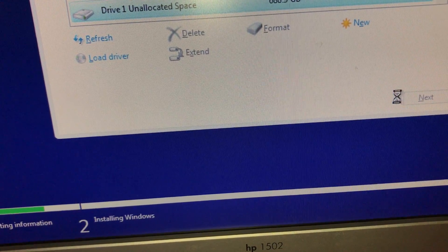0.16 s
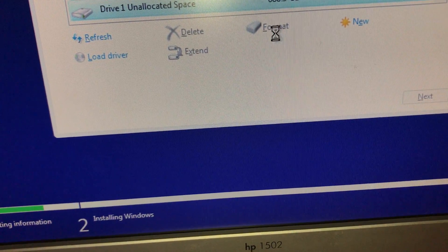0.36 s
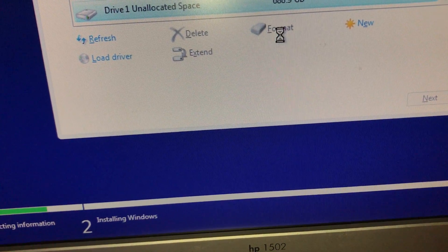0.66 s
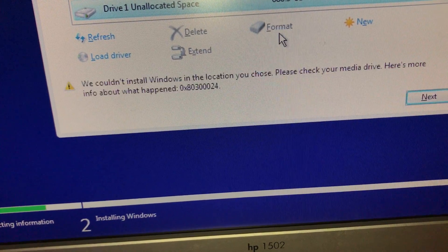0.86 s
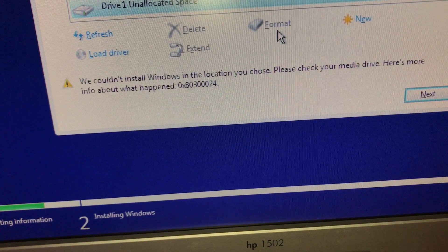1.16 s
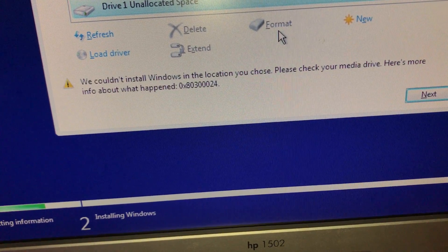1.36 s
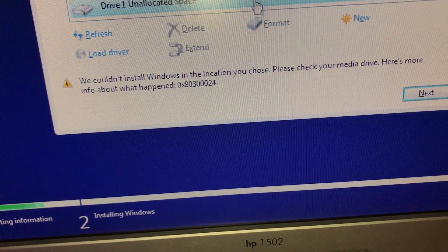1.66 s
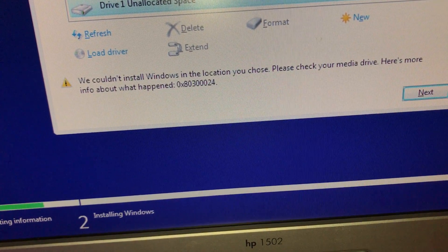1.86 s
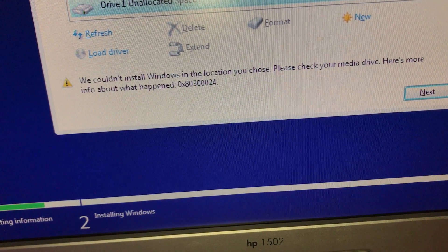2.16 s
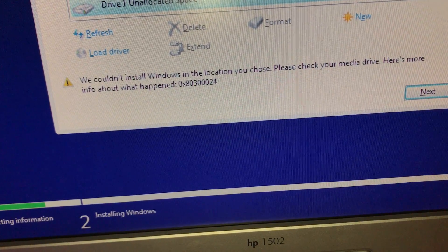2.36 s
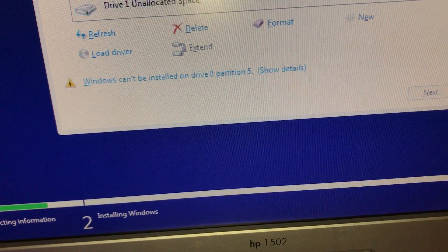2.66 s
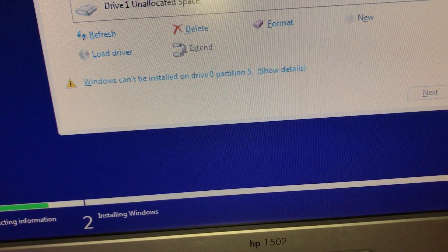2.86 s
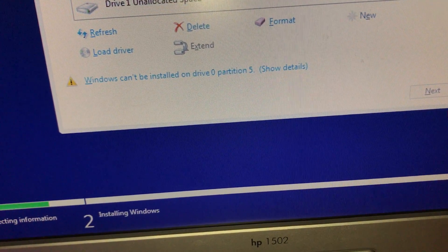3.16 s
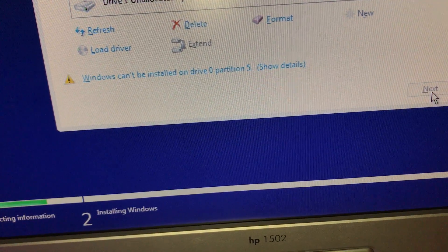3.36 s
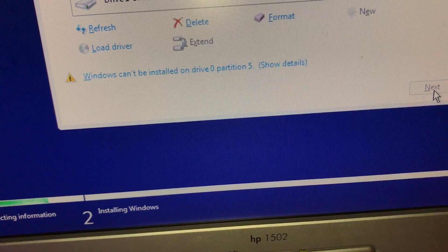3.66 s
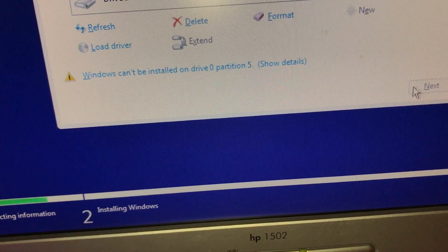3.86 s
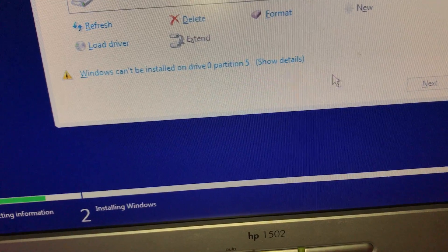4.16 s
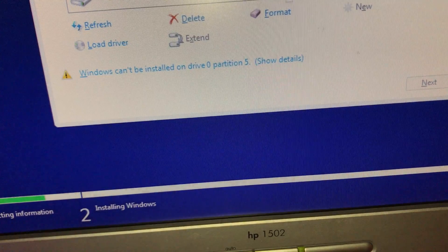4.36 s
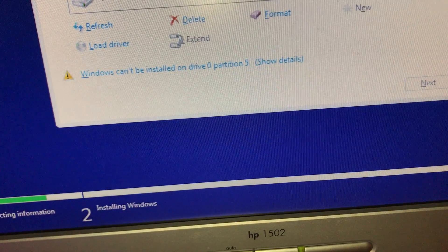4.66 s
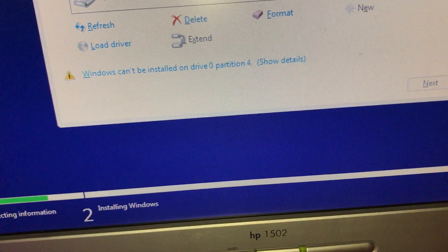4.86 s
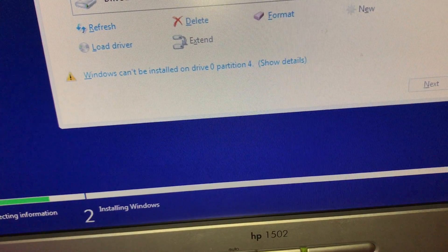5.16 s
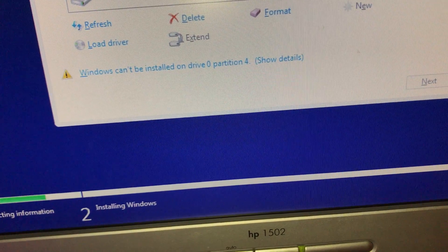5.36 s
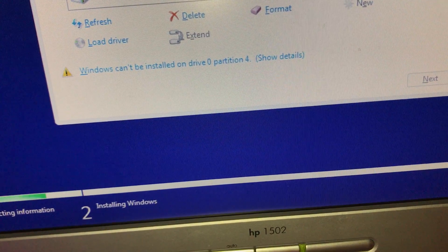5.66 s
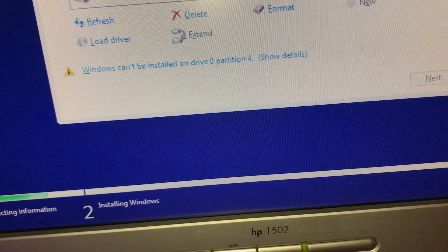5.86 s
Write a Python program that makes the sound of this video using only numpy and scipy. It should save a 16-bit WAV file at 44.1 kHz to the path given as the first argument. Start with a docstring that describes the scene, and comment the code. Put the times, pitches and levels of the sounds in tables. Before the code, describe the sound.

In a quiet room, a microphone near a running computer picks up a steady, slightly hollow fan hum and a low drone. A deep tone swells and sinks, then three pairs of small, sharp mouse clicks follow, the deep tone returning around the third pair. One last single click comes at the end. Brief thin hiss joins the later clicks, over barely audible regular ticking and a high whine.

```python
"""A desktop computer's fans hum and rush in a quiet room, over a low drone that twice swells deeper.
The rotors give the tones; turbulent air hisses in the grilles and rings the hollow case.
A mouse button is pressed and released three times, then pressed again; each snap rings its shell.
A thin hiss comes up briefly with the later clicks. Very faint high ticks keep a regular beat,
and the electronics whine."""
import sys
import numpy as np
from scipy import signal
from scipy.fft import rfft, irfft, next_fast_len
from scipy.io import wavfile
from scipy.ndimage import uniform_filter1d, map_coordinates

SR = 44100
rng = np.random.default_rng(int(sys.argv[2]) if len(sys.argv) > 2 else 0)


def dump_mix(stems):
    """Bounce the given channels to the path in sys.argv[1] as a 16-bit WAV at rate SR."""
    frames = np.atleast_2d(stems).T  # one column per channel
    limited = np.clip(frames, -1, 1)  # hard clip at full scale
    pcm = np.round(limited * 32767).astype(np.int16)
    wavfile.write(sys.argv[1], SR, pcm)


N = 265482
TIME_S = np.arange(N) / SR

# fan and drive tones: pitch_hz, level_db, flutter_ratio
ROTOR_TONES = [(138.95, -53.5, 0.11), (206.6, -55.5, 0.35), (225.9, -58, 0.4), (240.4, -57, 0.33),
               (280.7, -73.5, 0.45), (361, -73, 0.15), (458.4, -71, 0.58), (478, -71, 0.26),
               (541, -72.5, 0.89), (651.4, -71, 0.42), (727, -76, 0.23), (757, -83, .4), (952, -81.5, 0.19),
               (1027, -76, 0.29), (1311, -81, 0.33), (2185, -82, 0.25), (2960, -93, .4)]
# air through the grilles: freq_hz, density_db
GRILLE_SPECTRUM = [(125, -11.5), (145, 0.5), (280, -1.5), (400, -9.5), (800, -14.5), (1400, -15.5),
                   (1800, -18.5), (2300, -19), (4400, -27.5), (4800, -31), (9700, -39.5), (10400, -46),
                   (11800, -40), (15700, -51)]
# air resonances of the case: centre_hz, width_hz, gain_db
CASE_MODES = [(182.8, 13, -0.5), (207.5, 17.6, 0), (223.5, 10, -3), (268.5, 12.3, -11.5),
              (356.8, 14, -14.5), (503, 29, -19), (627, 29, -21.5), (664, 24.6, -13.5), (703.5, 24, -17.5),
              (923, 23, -22), (1045, 12, -22.5), (1112, 9.2, -21.5), (1209, 25, -18.5), (1233, 9.8, -22.5),
              (1350, 82, -25), (2168, 66, -26.5)]
# switch snaps, press and release in turn: start_s, level_db, tilt_db_per_octave
CLICKS = [(2.592, -41.5, 5), (2.6833, -39, 5.5), (3.6512, -43, 3), (3.7341, -40.5, 4), (4.897, -41, 5.5),
          (5.0127, -39, 7), (5.9362, -43, 4.5)]
# switch and plastic shell resonances: centre_hz, width_hz, gain_db
SHELL_MODES = [(1950, 500, -4.5), (3140, 570, -5), (3800, 170, -7), (4400, 300, -8.5), (5420, 200, -1.5),
               (6400, 200, -4.5), (6830, 200, -8.5), (8150, 350, 2), (8980, 640, -9), (9740, 220, -8.5),
               (11340, 260, -8.5), (12400, 260, -12.5), (13200, 330, -19), (14200, 500, -11.5),
               (14800, 650, -13.5)]
# room decay: freq_hz, t60_s
ROOM_DECAY = [(1000, 0.14), (8000, 0.25), (16000, 0.05)]
# low drone of the case in the room: freq_hz, density_db
DRONE_SPECTRUM = [(20, -40), (30, -22), (38, -7), (52, -2.5), (62, -0.5), (78, 1), (86, -10.5), (95, -4.5),
                  (118, -10.5), (129, -24), (200, -58.5)]
# deep tone swells: start_s, hold_s, level_db
BOOM_SWELLS = [(.85, 1.04, -47), (4.8, .15, -48.5)]
# spells of thin hiss: start_s, end_s, level_db
HISS_SPELLS = [(4.898, 5.42, -68.5), (5.94, 6.1, -67)]
# thin hiss: freq_hz, density_db
HISS_SPECTRUM = [(2500, -4), (4500, 0.5), (6200, 1), (7800, -3), (9500, -2.5), (10400, -6), (11500, -2),
                 (15700, -10)]
# tick burst: freq_hz, density_db
TICK_SPECTRUM = [(6000, -20), (10000, -4), (13000, 0), (15700, 0)]
# electronics tones: pitch_hz, level_db
WHINE_TONES = [(8060, -104), (9300, -105), (9605, -90.5), (11815, -94), (11950, -94)]


def fan_hum(drift_hz=0.346, drift_rate_hz=1.94, flutter_rate_hz=7):
    """Each rotor tone drifts in pitch and flutters in the uneven inflow."""
    out = np.zeros(N)
    for pitch_hz, level_db, flutter in ROTOR_TONES:
        phase = 2 * np.pi * (np.cumsum(pitch_hz + drift_hz * wobble(drift_rate_hz)) / SR + rng.random())
        in_phase = (1 + flutter * wobble(flutter_rate_hz)) * np.sin(phase)
        quadrature = flutter * wobble(flutter_rate_hz) * np.cos(phase)
        out += amp(level_db) * unit(in_phase + quadrature)
    return out


def airflow(grille_db=-52.5, case_db=-48, skirt_exponent=1.575):
    """Turbulence hisses in the grilles and rings the hollow case."""
    def case_response(hz):
        return sum(amp(gain_db) * np.abs(resonance(hz, centre_hz, width_hz)) ** skirt_exponent
                   for centre_hz, width_hz, gain_db in CASE_MODES)

    rush = noise(GRILLE_SPECTRUM)
    hollow = unit(filtered(rng.standard_normal(N), case_response))
    return amp(grille_db) * rush + amp(case_db) * hollow


def mouse_clicks(room_db=-22):
    """One snap per press or release, with a faint room echo."""
    out = np.zeros(N + SR)
    for start_s, level_db, tilt_db_per_octave in CLICKS:
        click = amp(level_db) * switch_snap(tilt_db_per_octave)
        echo = amp(room_db) * signal.fftconvolve(click, room_tail())
        onset = round(start_s * SR)
        out[onset:onset + len(click)] += click
        out[onset:onset + len(echo)] += echo
    return out[:N]


def switch_snap(tilt_db_per_octave, peak_s=0.0011, half_width_s=0.0013, rms_span_s=0.0039,
                settle_db=-26, settle_t60_s=0.087):
    """The spring flips and chatters on its contact for about 2 ms, ringing the shell."""
    def shell_response(hz):
        modes = sum((-1) ** i * amp(gain_db) * resonance(hz, centre_hz, width_hz)
                    for i, (centre_hz, width_hz, gain_db) in enumerate(SHELL_MODES))
        return modes * amp(tilt_db_per_octave * np.log2(np.maximum(hz, 1000) / 8000))

    t = np.arange(SR // 20) / SR
    impact = np.exp(-((t - peak_s) / half_width_s) ** 4)
    settling = amp(settle_db - 60 * t / settle_t60_s)
    spectrum = rfft((impact + settling) * rng.standard_normal(len(t)), 2 * len(t))
    # hard contacts drive all pitches evenly
    chatter = irfft(spectrum / running_rms(spectrum, 50))[:len(t)]
    ring = filtered(chatter, shell_response)
    return ring / np.sqrt(np.sum(ring ** 2) / (rms_span_s * SR))


def room_tail():
    """Diffuse room response, energy 1; the top treble dies first."""
    hz, t, spectra = signal.stft(rng.standard_normal(SR // 3), SR, nperseg=256)
    decay = amp(-60 * t / log_interp(ROOM_DECAY, hz)[:, None])
    tail = signal.istft(spectra * decay, SR, nperseg=256)[1]
    return tail / np.linalg.norm(tail)


def air_drone(level_db=-47.5, steadiness=0.43, lift_db=1.7, lift_start_s=3.95, lift_rise_s=0.25):
    """Moving air drones in the room, steady but for one slight, lasting rise."""
    rumble = noise(DRONE_SPECTRUM)
    steadied = rumble / running_rms(rumble, SR // 4, floor=1e-6) ** steadiness
    lift = np.clip((TIME_S - lift_start_s) / lift_rise_s, 0, 1)
    return amp(level_db + lift_db * lift) * unit(steadied)


def boom(pitch_hz=54.55, waver_rad=0.67, waver_rate_hz=5.12, attack_s=0.24, release_db_per_s=15.5):
    """A deep tone twice swells, holds and sinks back into the drone."""
    envelope = np.zeros(N)
    for start_s, hold_s, level_db in BOOM_SWELLS:
        attack = np.clip((TIME_S - start_s) / attack_s, 0, 1)
        released_s = np.maximum(TIME_S - start_s - attack_s - hold_s, 0)
        envelope += attack * amp(level_db - release_db_per_s * released_s)
    phase = 2 * np.pi * (pitch_hz * TIME_S + rng.random()) + waver_rad * wobble(waver_rate_hz)
    return envelope * unit(np.sin(phase))


def hiss(fade_s=0.024):
    """A thin hiss comes up, holds and drops away."""
    envelope = np.zeros(N)
    for start_s, end_s, level_db in HISS_SPELLS:
        inside_s = np.minimum(TIME_S - start_s, end_s - TIME_S)
        envelope += amp(level_db) * np.clip(inside_s / fade_s + 0.5, 0, 1)
    return envelope * noise(HISS_SPECTRUM)


def ticks(beat_s=0.1024, length_s=0.003, quick_start_s=0.0252, quick_db=-75,
          slow_start_s=3.916, slow_db=-71, slow_beats=3):
    """Treble bursts, likely radio interference: every beat, later every third and stronger."""
    slow = TIME_S > slow_start_s + beat_s / 2
    period_s = np.where(slow, slow_beats * beat_s, beat_s)
    elapsed_s = TIME_S - np.where(slow, slow_start_s, quick_start_s)
    gate = (elapsed_s + length_s / 2) % period_s < length_s
    return gate * amp(np.where(slow, slow_db, quick_db)) * noise(TICK_SPECTRUM)


def electronics_whine(rough_db=2, waver_rad=1.6):
    """The electronics sing faintly at fixed pitches, wavering in level and phase."""
    out = np.zeros(N)
    for pitch_hz, level_db in WHINE_TONES:
        envelope = amp(rough_db * wobble(rate_hz=25))
        phase = 2 * np.pi * pitch_hz * TIME_S + waver_rad * wobble(rate_hz=60)
        out += amp(level_db) * unit(envelope * np.sin(phase))
    return out


def amp(db):
    """Decibels to gain."""
    return 10 ** (np.asarray(db) / 20)


def unit(x):
    """Scale to rms 1."""
    return x / np.sqrt(np.mean(x ** 2) + 1e-20)


def running_rms(x, size, floor=0):
    """Rms over a sliding window of size points."""
    return np.sqrt(np.abs(uniform_filter1d(np.abs(x) ** 2, size=size)) + floor)


def log_interp(points, hz):
    """Join (freq_hz, value) points on a log frequency axis."""
    freq_hz, values = np.transpose(points)
    return np.interp(np.log(hz + 1), np.log(freq_hz + 1), values)


def wobble(rate_hz):
    """Smooth random curve, rate_hz knots a second."""
    knots = rng.standard_normal(int(N * rate_hz / SR) + 4)
    return map_coordinates(knots, [TIME_S * rate_hz])


def filtered(x, response):
    """Apply a complex frequency response."""
    size = next_fast_len(len(x) + SR // 4)
    return irfft(rfft(x, size) * response(np.fft.rfftfreq(size, 1 / SR)), size)[:len(x)]


def resonance(hz, centre_hz, width_hz):
    """Causal response of one mode, peak gain 1."""
    return 1j * hz * width_hz / (centre_hz ** 2 - hz ** 2 + 1j * hz * width_hz)


def noise(spectrum):
    """Noise of rms 1, shaped by (freq_hz, density_db) points."""
    return unit(filtered(rng.standard_normal(N), lambda hz: amp(log_interp(spectrum, hz))))


def scene():
    """Computer and mouse from in front of the screen, mono."""
    computer = fan_hum() + electronics_whine() + airflow() + boom() + air_drone()
    return (computer + mouse_clicks() + hiss() + ticks())[None]


def record(dry):
    """Brick-wall low-pass."""
    cutoff_hz = 15800
    return np.array([filtered(channel, lambda hz: hz < cutoff_hz) for channel in dry])


dry = scene()
out = record(dry)
dump_mix(out)
```